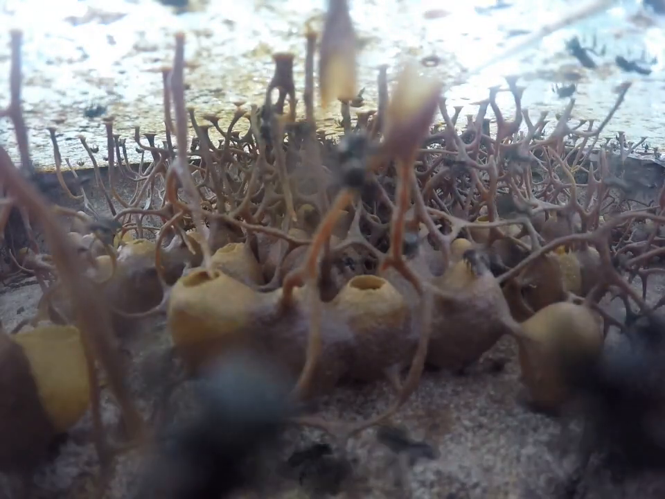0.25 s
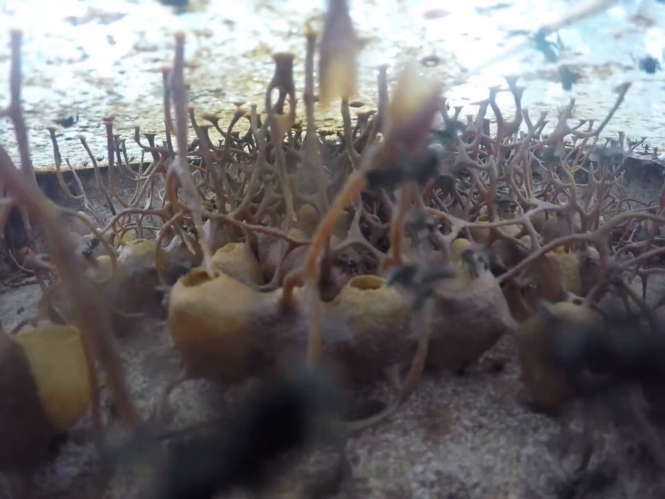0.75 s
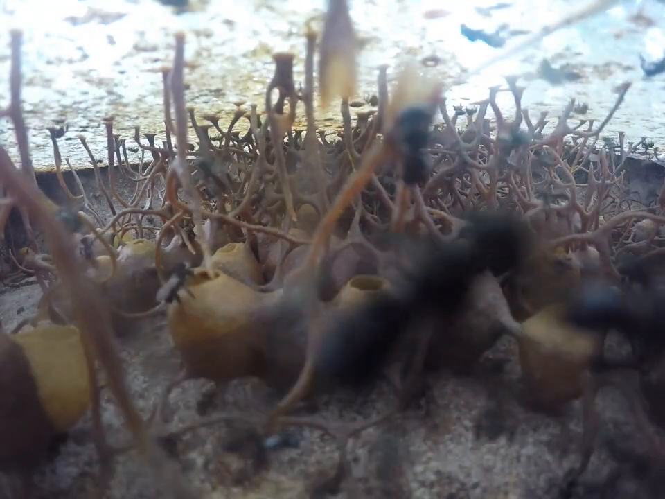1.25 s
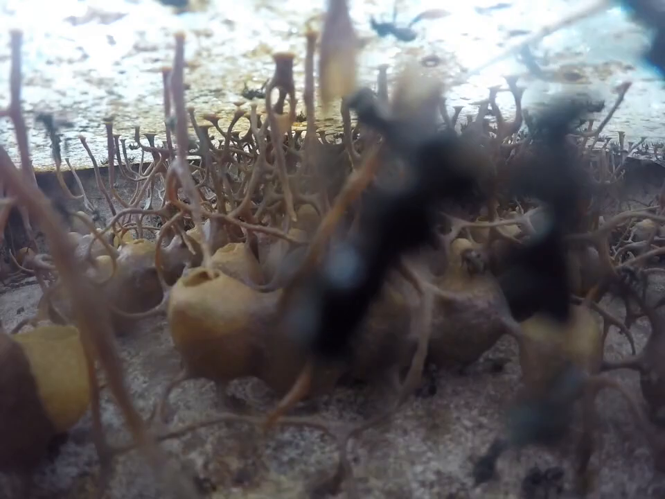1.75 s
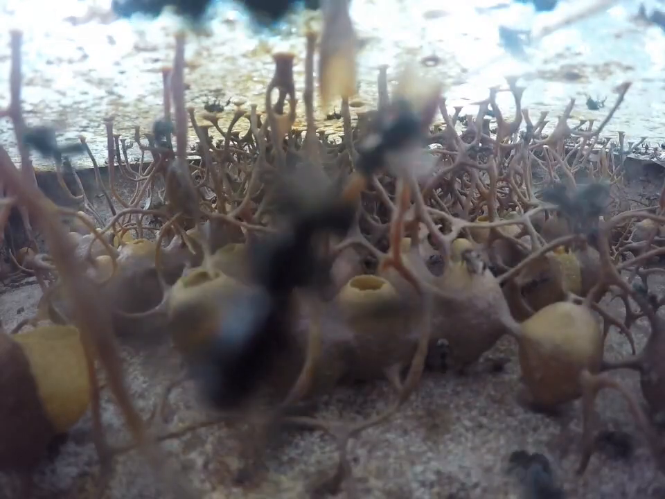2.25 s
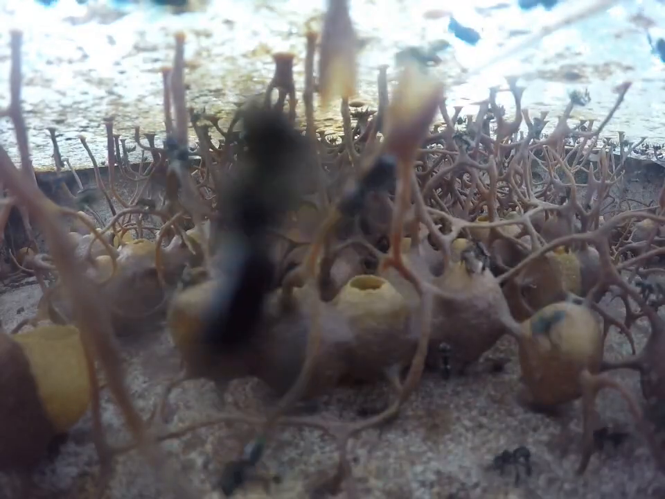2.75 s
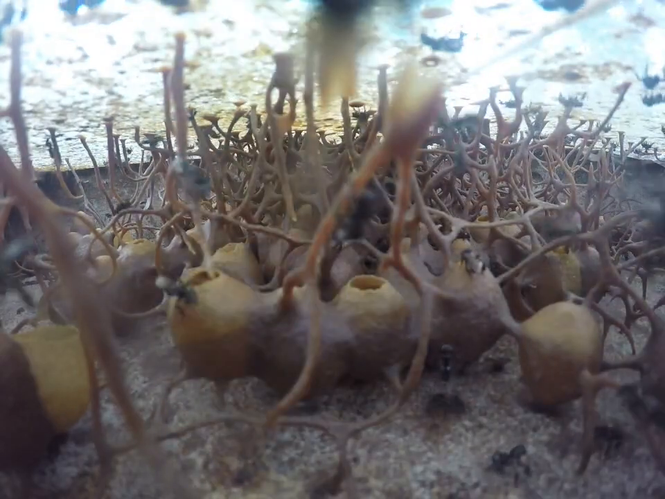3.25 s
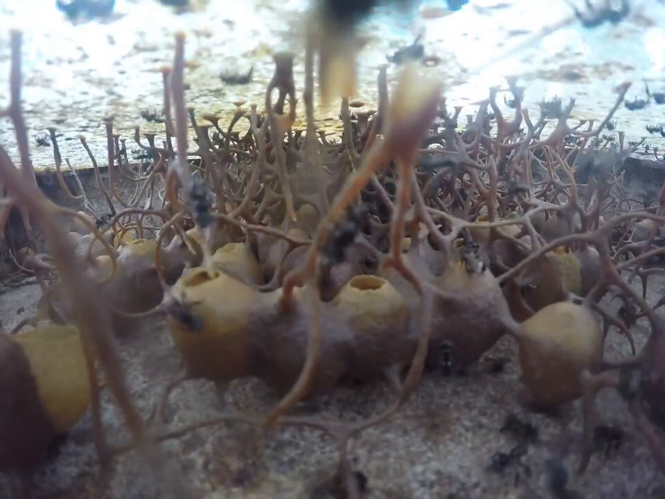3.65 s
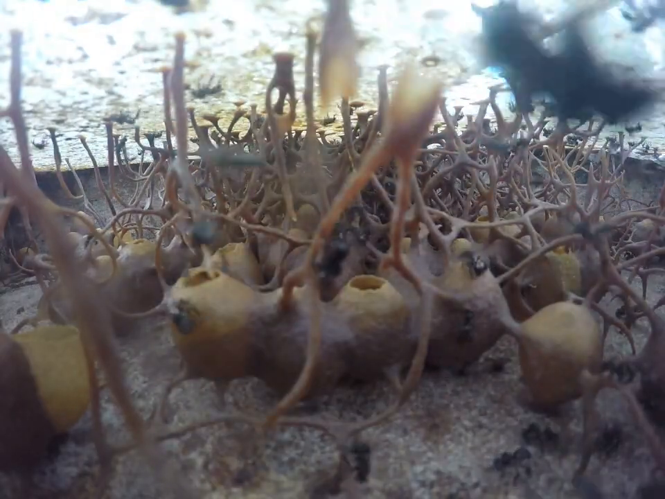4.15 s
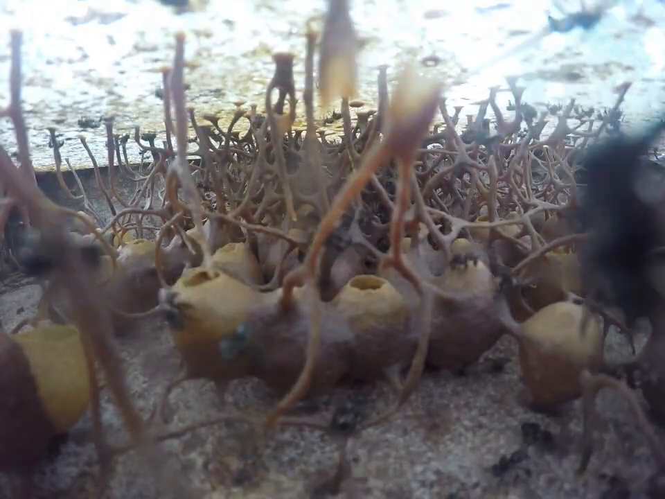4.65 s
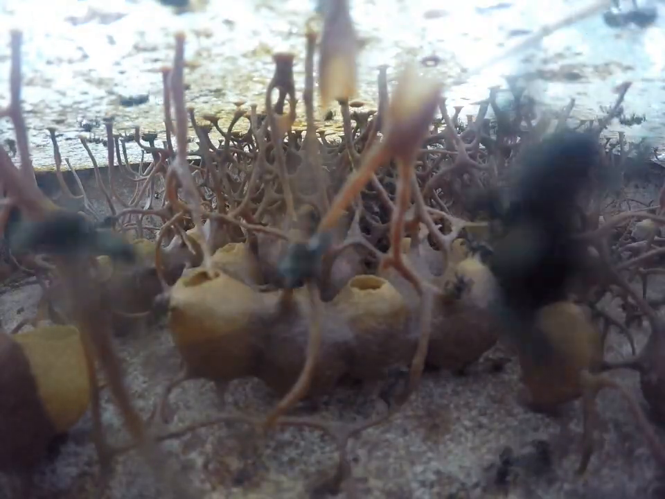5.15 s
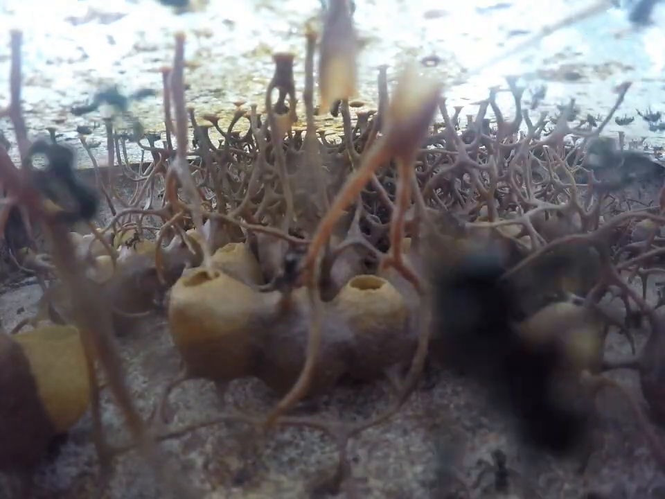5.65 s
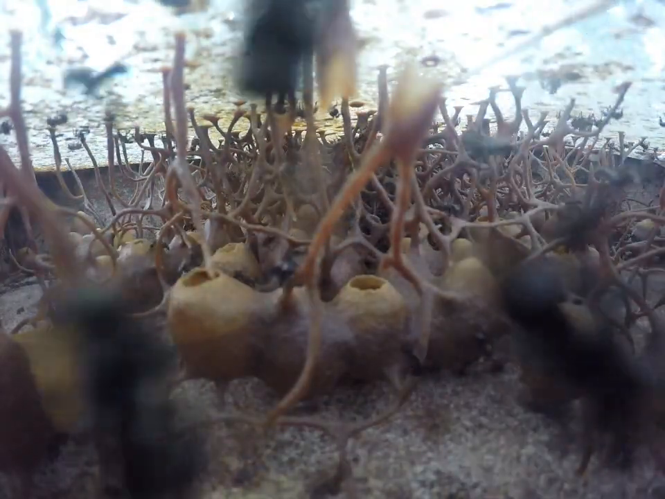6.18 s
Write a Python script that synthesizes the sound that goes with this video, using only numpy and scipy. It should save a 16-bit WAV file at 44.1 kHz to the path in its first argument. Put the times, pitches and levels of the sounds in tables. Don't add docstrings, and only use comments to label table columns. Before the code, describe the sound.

Claws tap, tick and scrape on a plastic housing while bee wings slap it in short rough buzzes, over faint hum and hiss.

```python
import sys
import numpy as np
from scipy import signal
from scipy.io import wavfile

SR = 44100
rng = np.random.default_rng(int(sys.argv[2]) if len(sys.argv) > 2 else 0)


def transcribe(signal):
    frames = np.atleast_2d(signal).T
    limited = np.clip(frames, -1, 1)
    pcm = np.round(limited * 32767).astype(np.int16)
    wavfile.write(sys.argv[1], SR, pcm)


def linear_from_db(decibels):
    return 10 ** (np.asarray(decibels, float) / 20)


N = 283122


def rms_one(x):
    return x / np.sqrt(np.mean(x ** 2) + 1e-20)


def drift(rate_hz):
    r = np.exp(-80 * np.pi * rate_hz / SR)
    noise = rng.standard_normal(N // 40 + 2002)
    slow = signal.lfilter([1], [1, -2 * r, r * r], noise)[2000:]
    return np.interp(np.arange(N) / 40, np.arange(len(slow)), rms_one(slow))


def in_time(rows):
    start_s, *columns = np.transpose(rows)
    return [np.interp(np.arange(N) / SR, start_s, column) for column in columns]


def resonate(x, hz, width_hz):
    r = np.exp(-np.pi * width_hz / SR)
    b = np.sqrt((1 - r * r) / 2) * np.array([1, 0, -1])
    return signal.lfilter(b, [1, -2 * r * np.cos(2 * np.pi * hz / SR), r * r], x + 1e-18)


def soften(x, hz):
    return signal.lfilter(*signal.butter(2, min(hz, 20000), fs=SR), x + 1e-18)


def trim(x):
    return signal.sosfilt(signal.cheby2(10, 40, 15850, fs=SR, output="sos"), x)


def air_and_hiss():
    # pitch_hz [Hz], width_hz [Hz], level_db [dB rms]
    box_air = [(26, 4.5, -63), (47.4, 4.9, -60), (91, 26, -64), (135, 15.4, -61.5), (279, 34, -64.5),
               (403, 175, -67), (882, 39, -68)]
    hiss_db, hiss_tilt_hz = -58.5, 2830
    out = np.zeros(N)
    for hz, width_hz, db in box_air:
        out += linear_from_db(db + 1.9 * drift(1.8)) * resonate(rng.standard_normal(N), hz, width_hz)
    r = np.exp(-2 * np.pi * hiss_tilt_hz / SR)
    hiss = signal.lfilter([1], [1, -r], rng.standard_normal(N))
    return out + linear_from_db(hiss_db) * rms_one(hiss)


def hum():
    # start_s [s], pitch_hz [Hz], level_db [dB]
    fanning = [(0.0, 134.6, -59), (0.16, 101, -64), (0.39, 141.2, -60), (0.45, 112.6, -58.5),
               (1.5, 133.8, -64), (1.64, 115, -52), (1.93, 141.7, -56.5), (2.54, 118.7, -54.5),
               (2.75, 149, -65), (2.81, 123, -66.5), (5.13, 135, -60), (5.7, 116.8, -60),
               (6.02, 146.8, -62), (6.42, 135, -69)]
    pitch_hz, level_db = in_time(fanning)
    phase = 2 * np.pi * np.cumsum(pitch_hz * (1 + 0.0499 * drift(15.0))) / SR
    tone = np.sin(phase) + 0.56 * np.sin(2 * phase)
    return linear_from_db(level_db - 2.0 + 3.89 * drift(6)) * tone


def rustle():
    # start_s [s], level_db [dB]
    bustle = [(0, -50), (.6, -54), (1.1, -49.5), (1.55, -54.5), (2.45, -50.5), (2.7, -52.5), (3.2, -53),
              (3.3, -53), (3.7, -50.5), (4.1, -53), (5.1, -53), (5.85, -57), (6.1, -51), (6.42, -45)]
    level_db, = in_time(bustle)
    upper_db = -9
    sizes = linear_from_db(4.06 * np.minimum(rng.exponential(1, N), 5)) * rng.choice([-1, 1], N)
    steps = rng.random(N) < 5000 * linear_from_db(3.0 * drift(30)) / SR
    feet = linear_from_db(level_db + 0.16 * drift(8.4)) * rms_one(sizes * steps)
    return np.outer(linear_from_db([-8.5, 0, upper_db + 6.5, upper_db + 1, upper_db - 6]), feet)


def touches():
    # start_s [s], peak_db [dB], spot_hz [Hz]
    taps = [(0.0575, -29, 1300), (0.2287, -28.5, 1960), (0.478, -36, 1830), (0.9316, -38, 2300),
            (1.063, -46, 2630), (1.166, -27.5, 2780), (1.882, -33, 1340), (1.943, -25.5, 4770),
            (1.9502, -36, 4400), (2.0248, -40, 2520), (2.1727, -25, 3334), (2.552, -31.5, 3300),
            (2.758, -22, 6940), (3.1463, -27, 3880), (3.1485, -30, 3000), (3.3487, -34.5, 2714),
            (3.625, -29.5, 1535), (3.6554, -42, 2500), (3.692, -34, 1920), (3.838, -32, 1600),
            (3.8778, -28, 2700), (3.981, -36, 2830), (4.155, -36, 1510), (4.2635, -29.5, 2810),
            (4.3744, -35, 1510), (4.9443, -27.5, 2640), (6.229, -30, 3300), (6.0189, -37.5, 2370),
            (6.1982, -29, 2500), (6.2075, -33, 2447), (6.221, -25.5, 2340), (6.2235, -27, 3330),
            (6.355, -39, 2500), (6.33, -38, 2500)]
    # start_s [s], peak_db [dB], spot_hz [Hz], upper_db [dB re peak]
    ticks = [(0.257, -29.5, 2820, 2.5), (0.3538, -35.5, 4800, -4.5), (1.0317, -34, 3300, -9.5),
             (1.3723, -35, 2486, 2.5), (1.3563, -38, 4500, -6), (1.386, -33, 1820, -2.5),
             (1.396, -28.5, 2600, -7.5), (1.404, -32, 3500, -16), (1.4093, -28.5, 2700, -13),
             (1.42, -32, 2600, -19), (1.6158, -37.5, 2850, -9), (1.697, -43, 4750, 8.5),
             (1.8106, -28, 3150, -4), (1.8805, -30.5, 3220, -3.5), (1.889, -42, 4540, 2),
             (2.032, -35.5, 3250, -7.5), (2.0492, -30.5, 3300, -6.5), (2.06, -33, 3320, -7),
             (2.091, -27.5, 3286, -4), (2.0989, -29.5, 3200, -9), (2.1183, -33, 3130, -8),
             (2.1324, -29, 3300, -11), (2.752, -31.5, 2743, -6), (3.101, -25.5, 7030, -9),
             (3.117, -31.5, 2500, -3.5), (3.3998, -21.5, 6900, -18), (3.7077, -34, 2030, -7),
             (4.2895, -50, 3000, 2.5), (4.3828, -33.5, 2407, -6), (4.4056, -31.5, 2800, -11),
             (4.4407, -31.5, 3376, -4), (4.5654, -37.5, 2600, -6), (4.6001, -30.5, 3120, -12),
             (6.0798, -38, 2424, -6.5), (6.0908, -33, 2900, -5)]
    # start_s [s], peak_db [dB], spot_hz [Hz]
    scrapes = [(0.299, -28, 2795), (.3197, -36, 2160), (0.5468, -34, 1840), (0.7043, -32.5, 2328),
               (0.719, -38, 2500), (1.1036, -29.5, 2920), (1.8439, -25.5, 4400), (2.3934, -29, 3300),
               (2.7165, -35, 2790), (2.809, -29, 2600), (2.816, -25, 2700), (3.1543, -27, 2600),
               (3.5824, -30.5, 2560), (3.63, -29, 3500), (3.8401, -32, 2040), (4.583, -35, 2700),
               (4.6247, -33, 2830), (4.7, -31.5, 4510), (4.782, -41, 3680), (6.059, -32, 2820),
               (6.1753, -47, 2830)]
    # start_s [s], peak_db [dB], spot_hz [Hz], upper_db [dB re peak]
    slaps = [(.156, -30, 2560, -14), (.1705, -31, 2700, -12), (1.2688, -28, 3370, -8),
             (1.2972, -27, 3300, -7), (2.9245, -21, 6900, -8), (2.977, -22, 2400, -10),
             (3.0297, -16, 2700, -12), (3.0587, -24, 2300, -14), (3.4292, -15, 7000, -14),
             (3.4333, -9, 6900, -14), (3.4375, -11, 6900, -13), (3.497, -20, 3200, -8)]
    rows = [(*row, -17, 0.012) for row in taps]
    rows += [(*row, 0.012) for row in ticks]
    rows += [(*row, -13.5, 0.046) for row in scrapes]
    stray_count = 26
    for k, (when, loud, pitch) in enumerate(rng.random((stray_count, 3))):
        start_s = (k + when) * 6.3 / stray_count
        rows.append((start_s, -38.5 + 7 * (loud - .5), 2800 * 2 ** (pitch - .5), -21, 0.027))
    return rows + [(*row, .005) for row in slaps]


def claws():
    clean_tap_s, crack_db, crack_width_hz = 0.035, -1, 2400
    spot, blows = np.zeros(N), np.zeros((5, N))
    rows, reach = touches(), np.ones((5, 2000))
    reach[3:, 0] = .45
    chance = rng.standard_normal((len(rows), 2, 2000))
    for (s, db, hz, upper_db, dying_s), (sizes, marks) in zip(rows, chance):
        at = int(s * SR)
        age = np.arange(2000) / SR / np.clip(dying_s, .005, .06)
        drag = linear_from_db(.4 * upper_db + 3)
        slips = sizes * np.where(marks > 2.1, 2.2, .35)
        spray = drag * slips * np.minimum(age / 0.71, 1) * linear_from_db(-60 * age ** 2)
        spray[0] = np.clip(3.4 - 1.6 * drag, 1.2, 3.2) * min(clean_tap_s / dying_s, 1) ** 2
        spray = linear_from_db(db) * spray
        spot[at:at + 2000] += linear_from_db(1.5) * resonate(spray, hz, .11 * hz)
        spot[at:at + 2000] += linear_from_db(crack_db) * resonate(spray, hz, crack_width_hz)
        family_db = [[-18], [-8], [upper_db + 12], [upper_db + 11.5], [upper_db + 8.0]]
        blows[:, at:at + 2000] += linear_from_db(family_db) * spray * reach
    return spot, blows


def wing_blows():
    # start_s [s], body_db [dB], beat_hz [Hz], upper_db [dB re body], upstroke [share 0-1]
    brushes = [
        [(.102, -42.5, 307, -10, 0.2), (.133, -40, 258.7, -11, 0.26), (.152, -38.5, 278, -28, 0.8),
         (.176, -43, 329, -14, 1), (.203, -62, 340, -24, 1)],
        [(.226, -42.5, 262, -13, 0.23), (.258, -35, 266.2, -5, 0.6), (.285, -54, 273, -10, 0.23)],
        [(2.438, -48, 246, 6, 0.74), (2.46, -41.5, 244, -2.5, 0.2), (2.472, -47, 229, -11, 0.3)],
        [(3.555, -44.5, 247, -6, 0.42), (3.585, -47.5, 251.4, 9, 0.4), (3.638, -51.5, 250, 4, 0.5),
         (3.66, -60, 254.4, -8, 0.5)],
        [(6.287, -18.5, 176, -15, 0.3), (6.293, -27, 177, -20, 0.3), (6.312, -58, 175, -22, 0.2),
         (6.34, -74, 171.3, -9, .2)],
    ]
    short_press = [(1.256, -39.5, 266.4, -10, 0.23), (1.272, -33, 261.4, -4, 0.26),
                   (1.295, -38.5, 255.2, 3, 0.37), (1.31, -34.5, 247, -0.5, 0.45),
                   (1.331, -36, 277.5, -6, 0.41), (1.338, -44, 276, -6, 0.29), (1.35, -43, 283, -3, 0.42)]
    long_press = [(2.829, -28.5, 259, -2.5, 0.2), (2.84, -45, 258.8, 7.5, 0.15),
                  (2.856, -31, 252.2, 0.5, 0.45), (2.889, -32.5, 246.2, 0, 0.51),
                  (2.908, -28.5, 237, -0.5, 0.32), (2.928, -34, 231.3, 7.5, 0.44),
                  (2.945, -27, 237, -5.5, 0.37), (2.968, -37.5, 228, 9.5, 0.94),
                  (2.9752, -26, 228, -10, 0.7)]
    hard_press = [(3.392, -46, 240, -14, 0.45), (3.413, -36, 241, -14, 0.36), (3.426, -39, 240, 0, 0.25),
                  (3.4395, -42, 238, 0, .1), (3.4415, -28.5, 237, -3, 1), (3.468, -28, 236, 2, .8),
                  (3.497, -28.5, 240, -1, 0.65), (3.521, -35.5, 284, 0, 0.5), (3.536, -48, 288, -2, 0.65)]
    last_press = [(6.3603, -21.5, 178, -17, .1), (6.366, -28, 183, -18, .1), (6.3715, -21.5, 194, -16, .1),
                  (6.377, -17, 216, -17, .45), (6.387, -14.5, 233, -18, .8), (6.396, -18.5, 243, -15, .8),
                  (6.404, -24, 250, -15, .7), (6.412, -33, 250, -13, .6), (6.42, -35, 246, -12, .5)]
    regrip = [(2.977, -26, 243.2, -8, 1), (3.002, -27, 240, -5, 1), (3.022, -27.5, 227, -1.5, 0.91),
              (3.04, -29, 226.6, -2.5, 1), (3.055, -29, 230.7, -17, 1), (3.072, -37, 259.7, -3, 0.42),
              (3.092, -48, 294, -1, 0.68)]
    # spot_hz [Hz], spot_db [dB re body], low_db [dB re body],
    # thin_db [dB re upper ring], top_db [dB re upper ring]
    wing_spots = [
        (2000, 0.5, 1, 4, -5),
        (1600, -15, -5, 11.5, 9),
        (1680, 2.5, -14, 0, -15),
        (2600, -28, -5, 1.5, -20),
        (5440, -20, -13.5, -12, -28),
        (1920, -3, -6, 8, 0),
        (2140, -7, -7, 1, -8.5),
        (2600, -4, -6, -1, -9),
        (5460, -14, -15.5, -3, -17),
        (2600, -7, -5, 1, -8),
    ]
    wing_rough = [.33, .5, .2, .7, .15, .3, .4, .38, .12, .38]
    cracks = [-8, -9, -12, -9, -10, -14, -9, -7.5, 2, -9]
    crack_hz, crack_width_hz = 2700, 1114
    low_lingers = 0.34
    full_rough_upstroke, beat_waver = .4, .015
    spots, blows, unsteady = np.zeros(N), np.zeros((5, N)), drift(36)
    bursts = brushes + [short_press, long_press, hard_press, last_press, regrip]
    for rows, place, rough, crack_db in zip(bursts, wing_spots, wing_rough, cracks):
        spot_hz, spot_db, low_db, thin_db, top_db = place
        s, *columns = np.transpose(rows)
        span = np.arange(int(s[0] * SR), min(int(s[-1] * SR), N))
        body_db, beat, upper_db, upstroke = [np.interp(span / SR, s, c) for c in columns]
        rough = rough * np.clip(upstroke / full_rough_upstroke, .3, 1.15)
        beat = beat * (1 + beat_waver * rough * unsteady[span])
        strokes = 2 * np.cumsum(beat) / SR
        at = np.flatnonzero(np.diff(strokes.astype(int), prepend=-1))
        down = strokes[at].astype(int) % 2 == 0
        lateness, force = np.clip(rng.standard_normal((2, 300)), -1.6, 1.6)[:, :len(at)]
        stroke_size = np.sqrt(SR / beat[at])
        even, slaps = np.zeros((2, len(span)))
        even[at] = down * stroke_size * linear_from_db(rough[at] * 3 * force)
        late = np.clip(at + (rough[at] * 6 * lateness).astype(int), 0, len(span) - 1)
        slaps[late] = np.where(down, 1, np.clip(upstroke[at], 0, 1)) * stroke_size * linear_from_db(rough[at] * 6.5 * force)
        rasp = rng.standard_normal(15000)[:len(span)] * np.exp(-2.5 * (strokes % 1)) * 2.2
        low_db = low_db + low_lingers * (body_db.max() - body_db - 9.5)
        feeds = [(low_db, even, .5), (0, slaps, 1), (upper_db + thin_db, slaps, 1.4),
                 (upper_db, slaps, 1.3), (upper_db + top_db, slaps, 1.6)]
        for family, (db, hits, rasp_share) in enumerate(feeds):
            mix = np.minimum(rough * rasp_share, 1)
            blows[family, span] += linear_from_db(body_db + db - 3.5) * (np.sqrt(1 - mix ** 2) * hits + mix * rasp)
        ringing = resonate(np.pad(blows[1, span], (0, 400)), spot_hz, .1 * spot_hz)[:N - span[0]]
        spots[span[0]:span[0] + len(ringing)] += linear_from_db(spot_db) * ringing
        crack = resonate(linear_from_db(body_db + crack_db - 15) * slaps, crack_hz, crack_width_hz)
        spots[span] += resonate(crack, crack_hz, crack_width_hz)
    return spots, blows


def plucks():
    # start_s [s], level_db [dB], pitch_hz [Hz]
    strands = [
        (.9296, -19, 1740),
        (.9319, -21, 1740),
        (.548, -28, 1560),
        (4.945, -21, 1130),
    ]
    out = np.zeros(N)
    for s, db, hz in strands:
        at = int(s * SR)
        out[at:at + 2000] += linear_from_db(db) * resonate(np.arange(2000) == 0, hz, 84)
    return out


def flicks():
    # start_s [s], length_s [s], level_db [dB]
    runs = [(0.718, 0.029, -41), (1.102, 0.0066, -21.5), (1.19, .004, -32), (2.272, 0.0034, -39),
            (2.328, 0.0032, -29.5), (4.55, 0.0039, -43), (4.608, .004, -45), (4.6262, 0.054, -32.5),
            (4.681, 0.045, -36), (4.815, 0.041, -33.5), (4.893, 0.025, -50), (4.9878, .06, -36.5),
            (5.081, 0.032, -36), (6.045, .035, -39)]
    beat_hz, fade_db, upper_db = 154, -11, 5
    tips = np.zeros(N)
    for (s, length, db), (lateness, force) in zip(runs, rng.standard_normal((len(runs), 2, 12))):
        age = np.arange(0, length, 1 / beat_hz)[:12]
        late = .0004 * lateness[:len(age)] * (age > 0)
        at = ((s + age + late) * SR).astype(int)
        tips[at] = linear_from_db(db + fade_db * age / length + 2.0 * force[:len(age)])
    return np.outer([0, 0, linear_from_db(upper_db + 3.5), linear_from_db(upper_db), 1], tips)


def ring_family(blows, family, swell_db):
    total = np.sqrt(np.sum(linear_from_db(np.array(family)[:, 2]) ** 2))
    rings = [resonate(blows * linear_from_db(db + swell_db * drift(20.2)), hz, width_hz) for hz, width_hz, db in family]
    return (sum(rings[::2]) - sum(rings[1::2])) / total


def housing(blows):
    # pitch_hz [Hz], width_hz [Hz], level_db [dB]
    low = [(237, 150, 0.5), (678, 250, 6), (1019, 71, 8.5), (1103, 96, 7.5), (1510, 210, 4), (510, 130, -8),
           (1830, 170, 8.5)]
    body = [(1974, 21, -0.5), (2092, 81, 3.5), (2520, 490, 14.5), (2820, 310, 13.5), (3050, 120, 9),
            (3320, 117, 7)]
    thin = [(3620, 460, 4.5), (4400, 210, 8.8), (4407, 400, 12.4), (5760, 1360, 2.54)]
    upper = [(6380, 1020, 3.7), (7104, 1900, 2.66)]
    top = [(9400, 600, 0), (10400, 800, -4), (12700, 900, -4), (14200, 1000, -8), (15500, 900, -9)]
    soft_hz = [2500, 4400, 7600, 10800, 16400]
    wander_db = [2.8, 1.6, 2, 2, 2]
    families = zip(blows, (low, body, thin, upper, top), soft_hz, wander_db)
    return sum(ring_family(soften(force, hz), family, swell_db) for force, family, hz, swell_db in families)


def scene():
    background = trim(air_and_hiss()) + hum()
    feet = rustle()
    claw_spots, claw_force = claws()
    wing_spots, wing_force = wing_blows()
    strands = plucks()
    rings = housing(claw_force + trim(wing_force + feet + flicks()))
    spots = soften(wing_spots, 6750) + soften(claw_spots, 3820)
    return (rings + spots + strands + background)[None]


def low_pass(x):
    return signal.sosfilt(signal.butter(12, 16310, fs=SR, output="sos"), x)


def record(dry):
    mix = signal.sosfilt(signal.cheby2(12, 50, 16350, fs=SR, output="sos"), dry)
    return low_pass(mix)


dry = scene()
out = record(dry)
transcribe(out)
```